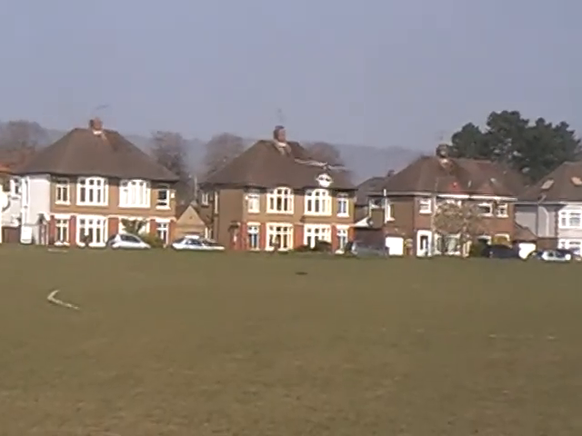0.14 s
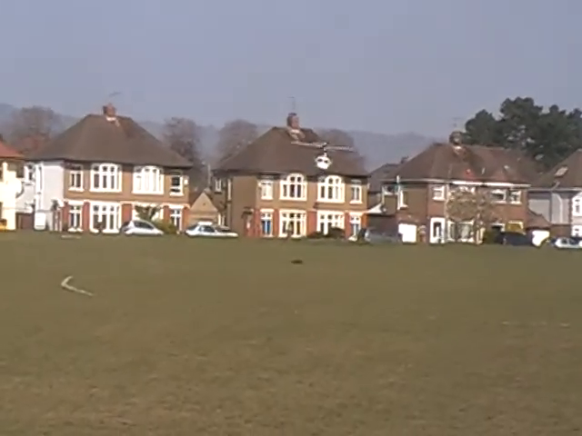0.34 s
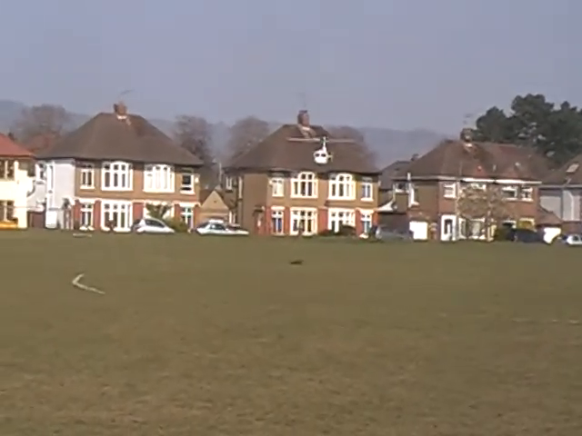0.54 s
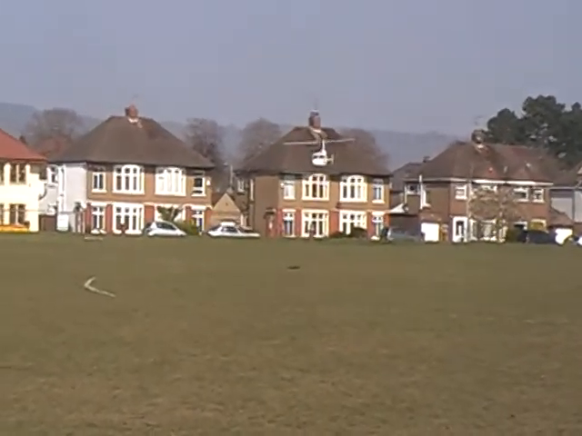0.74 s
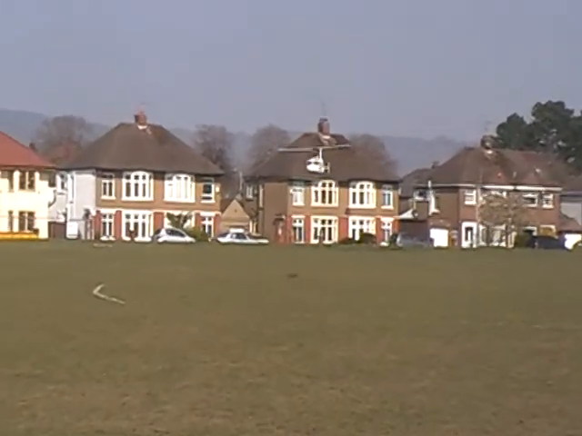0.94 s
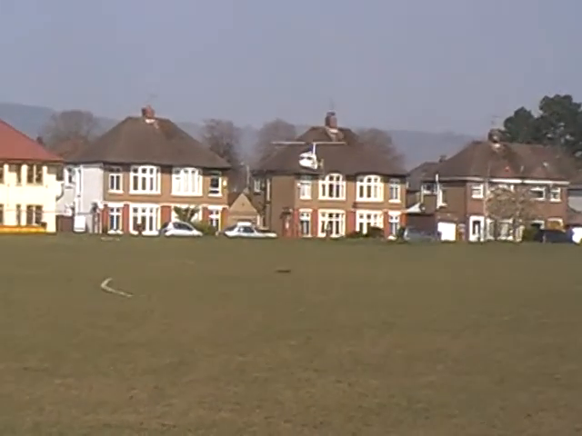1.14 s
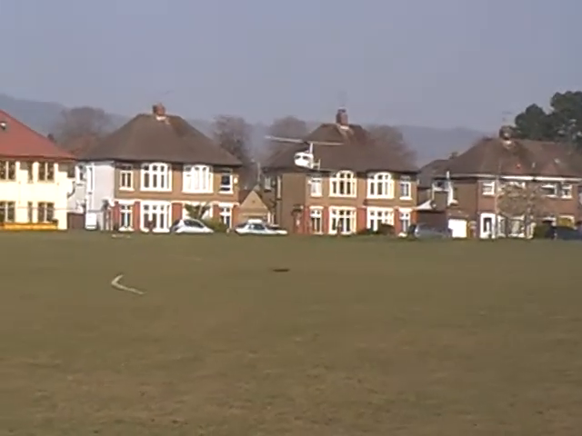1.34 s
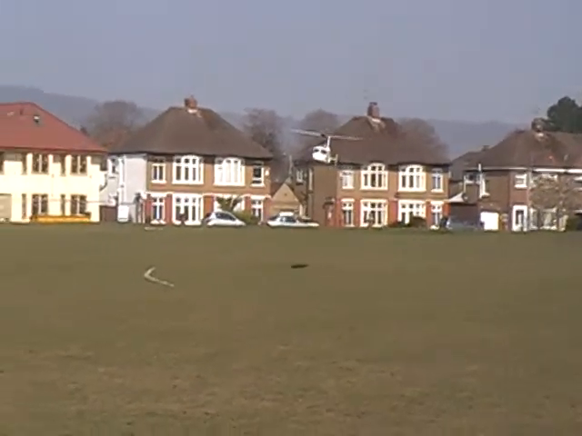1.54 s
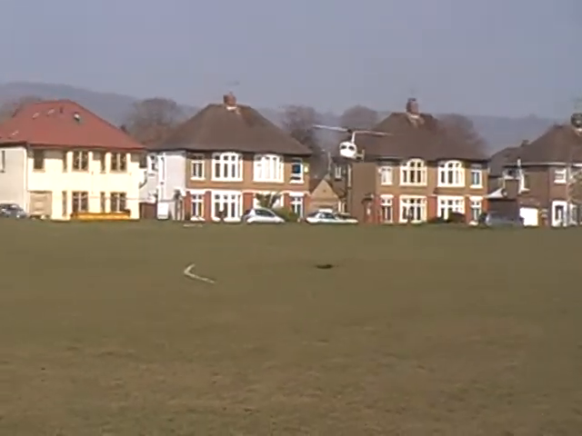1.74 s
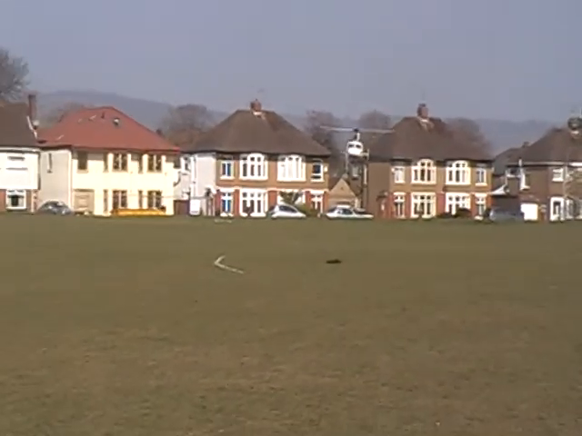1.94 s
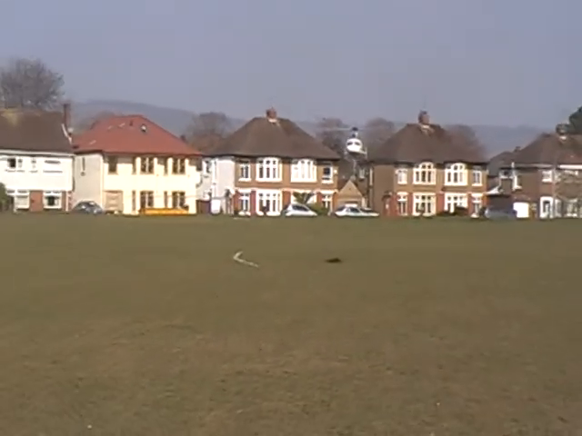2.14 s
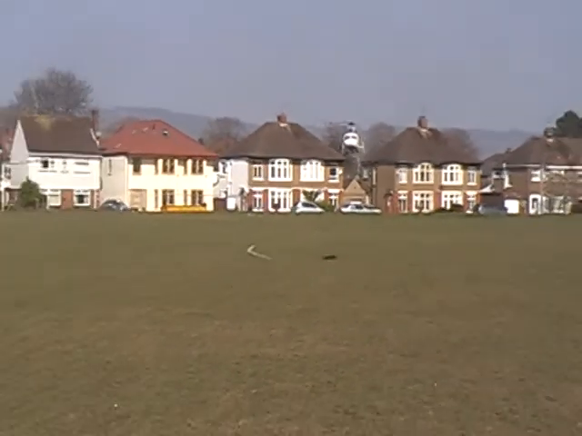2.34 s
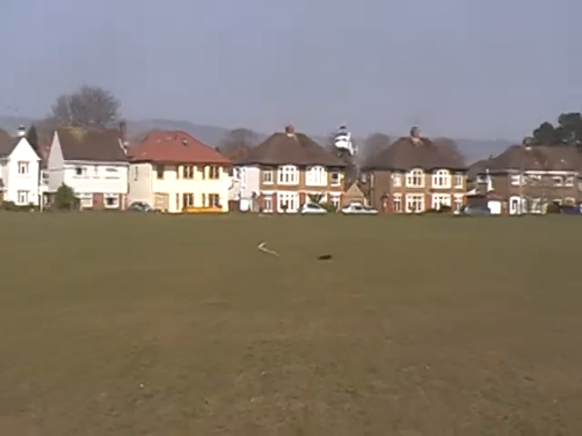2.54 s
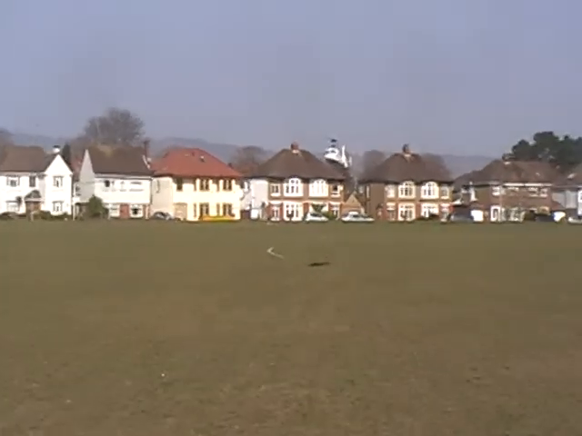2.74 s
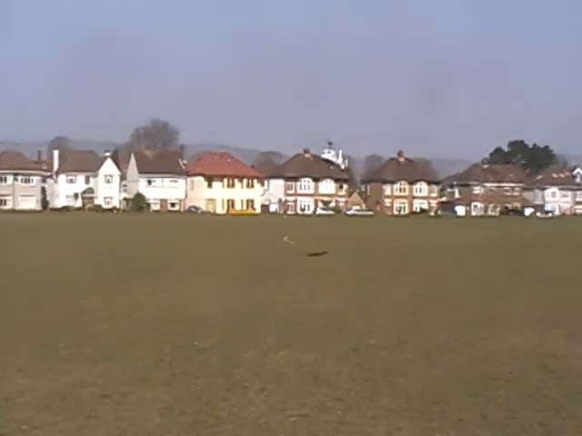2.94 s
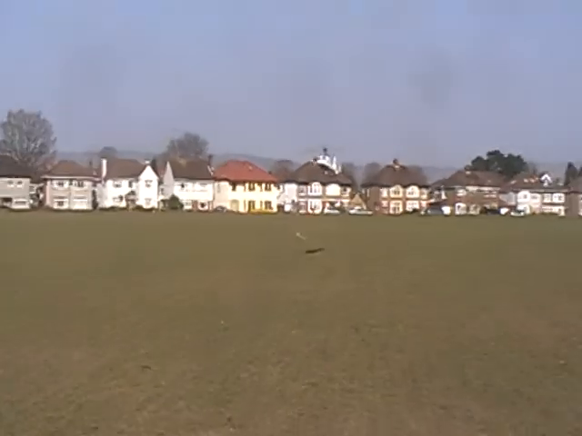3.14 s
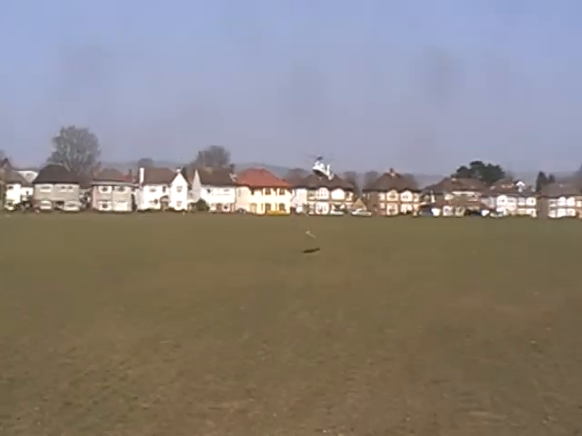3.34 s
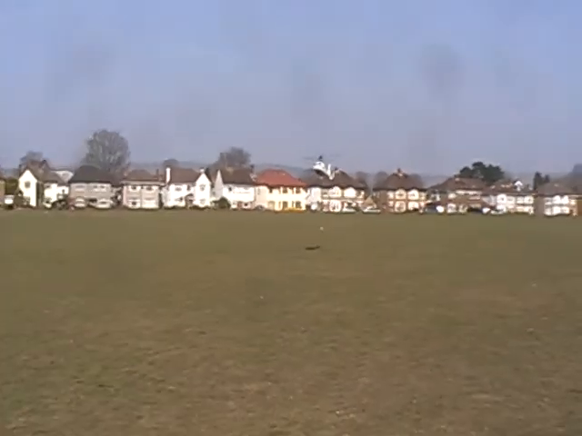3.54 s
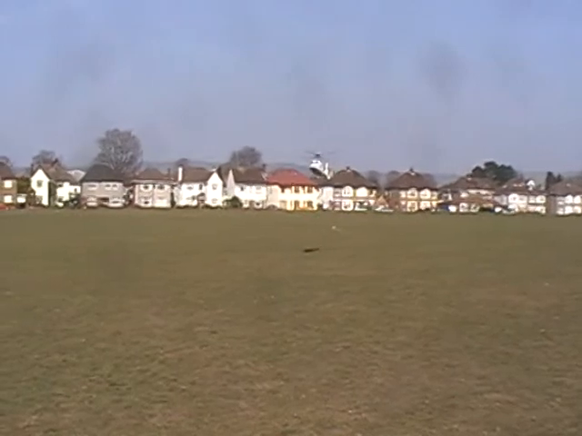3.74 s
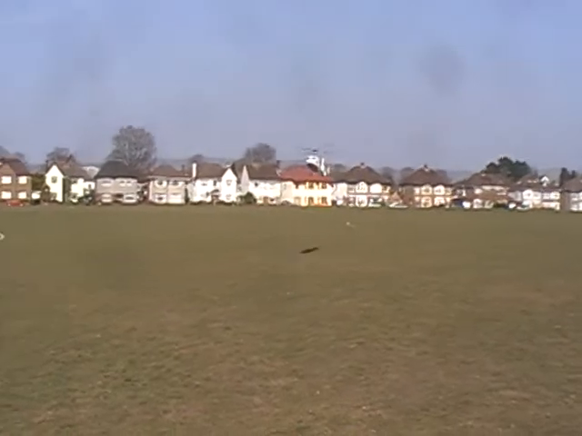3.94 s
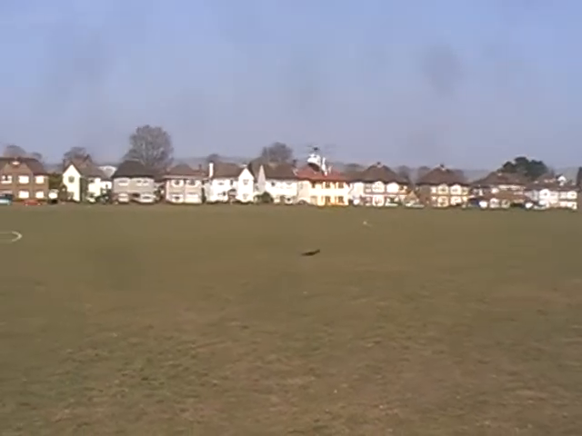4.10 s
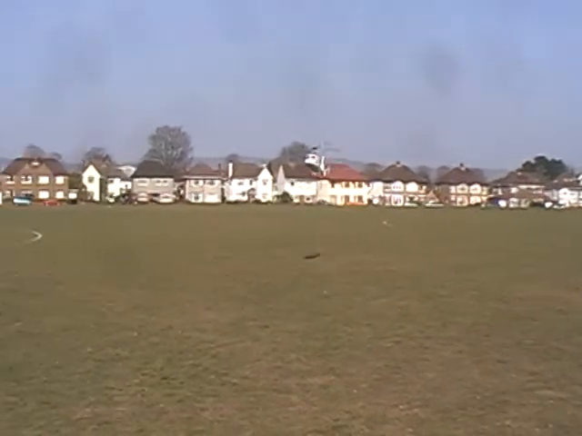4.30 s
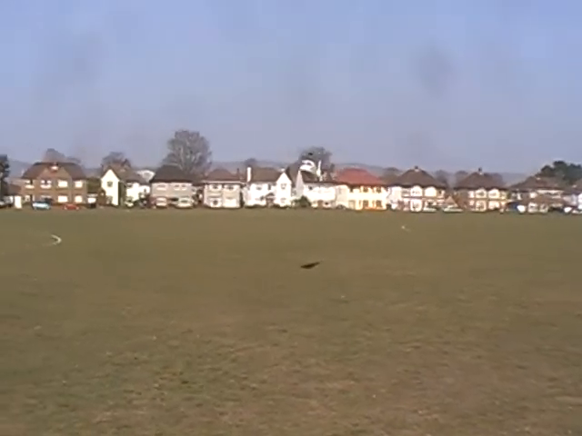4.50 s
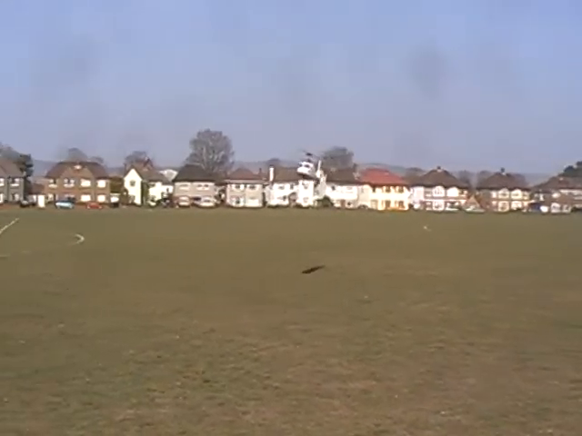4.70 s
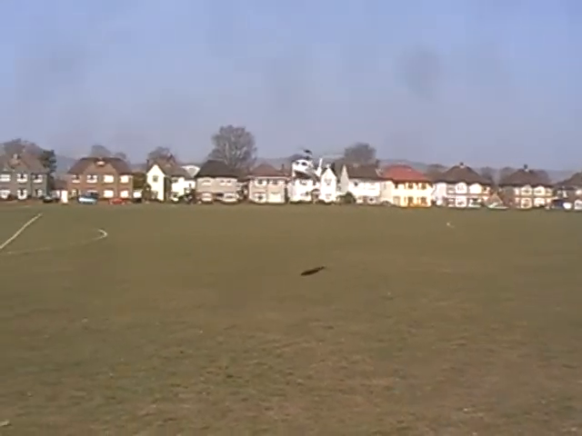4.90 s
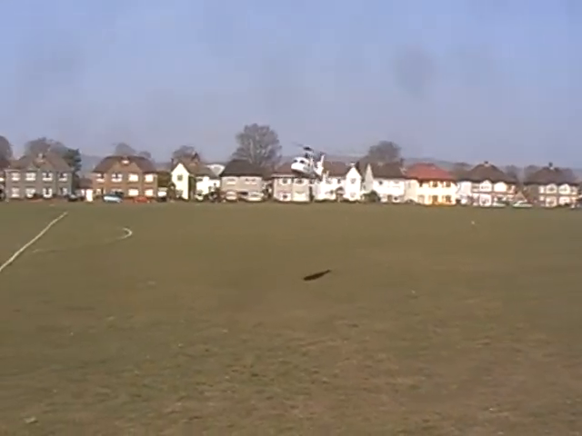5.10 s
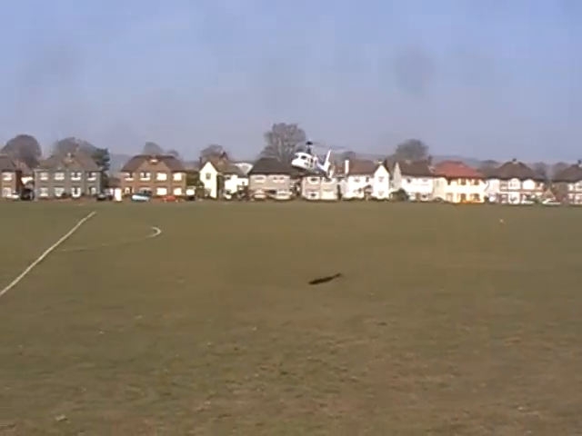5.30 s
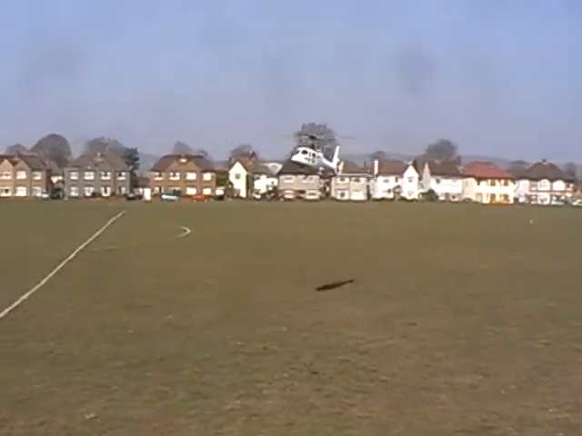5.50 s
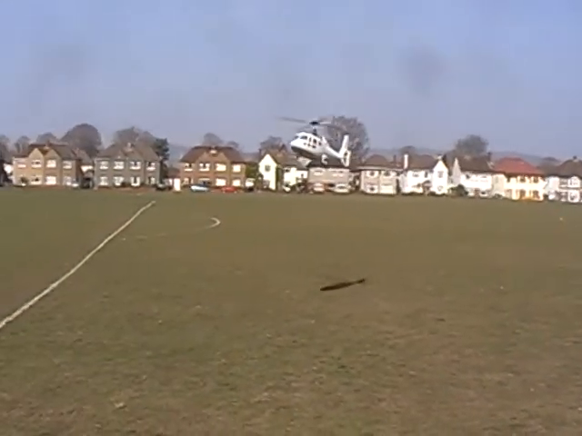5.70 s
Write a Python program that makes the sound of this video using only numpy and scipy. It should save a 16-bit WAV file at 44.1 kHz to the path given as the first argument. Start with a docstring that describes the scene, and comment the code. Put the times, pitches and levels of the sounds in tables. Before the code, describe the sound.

The buzzing two-stroke drone and rushing blades of a model helicopter hover outdoors, sag in pitch, then swell nearer in a light breeze.

```python
"""A buzzing two-stroke drone over rushing blades: a petrol model helicopter, about 20 m off on a playing field.
It hovers nose-on, turns away, then swings back side-on to 6 m from the microphone. The exhaust sings and
hisses, the main gear whines and ticks. The drone also arrives off the grass, so that hollow notches sweep
down the spectrum as it climbs and nears. A light breeze touches the microphone."""
import sys
import numpy as np
from scipy import signal
from scipy.fft import rfft, irfft, next_fast_len
from scipy.io import wavfile
from scipy.ndimage import map_coordinates

SR = 44100
rng = np.random.default_rng(int(sys.argv[2]) if len(sys.argv) > 2 else 0)


def persist_wave(psi):
    """Save psi, clipped to +-1, as 16-bit WAV."""
    counts = np.round(np.clip(psi, -1, 1) * 32767).astype(np.int16)
    wavfile.write(sys.argv[1], SR, np.atleast_2d(counts).T)


N = 254016

# the exhaust tone that the blades chop hardest: firing_multiple, nose_db, tail_db, flank_db
CHOPPED_TONE = [(14, -16.5, -17, -21)]


def crankshaft(slack):
    """Turns of the engine so far; its speed hunts more widely when unloaded."""
    # engine speed at the microphone, sagging through the turn: time_s, firing_hz
    speed = [(0.0, 163.7), (0.67, 163.1), (0.83, 162.3), (2.0, 161.4), (2.49, 159.6), (2.53, 154.8),
             (2.62, 157.6), (2.68, 152.5), (2.76, 156.2), (2.84, 152), (2.9, 154.1), (2.95, 150.6),
             (3.0, 150.8), (3.67, 143.5), (4.15, 145.6), (4.7, 148.5), (5.21, 153), (5.76, 155.7)]
    firing_hz, = curves(speed)
    hunt_hz, swing_hz = 9.6, 0.15 + 0.3 * slack
    hunt = np.sin(2 * np.pi * (hunt_hz * np.arange(N) / SR + 0.23 * wobble(4)))
    return np.cumsum(firing_hz + swing_hz * hunt) / SR


def exhaust(firings, turns, view):
    """The pipe sings harmonics of the firing rate, pulsing slightly with each turn of the rotor."""
    # exhaust tones: firing_multiple, nose_db, tail_db, flank_db
    harmonics = [(1, -16.5, -26.5, -26.5), (2, -19, -10, -18), (3, -22, -22.5, -32), (4, -11, -12, -14),
                 (5, -27, -16, -29), (6, -17, -16.5, -26), (7, -30, -19, -25.5), (8, -25, -22, -23),
                 (9, -19.5, -17, -15.5), (10, -26.5, -15, -25), (11, -22, -12.5, -17),
                 (12, -12.5, -15, -16.5), (13, -27, -17, -18), (15, -28, -16.5, -21), (17, -20, -43, -20),
                 (18, -19, -40, -40), (19, -27, -43, -22), (21, -24, -47, -24), (23, -14.5, -51, -26),
                 (24, -19.5, -40, -22), (25, -51, -30, -22), (26, -30, -31, -41), (33, -13.5, -36, -36),
                 (38, -18, -47, -20), (49, -49, -35, -21)]
    # swells and fades as the pipe swings past the microphone: firing_multiple, time_s, half_s, rise_db
    swings = [(1, 2.4, 0.4, 4), (1, 4.85, .14, 7), (1, 5.28, 0.12, 12), (1, 5.53, .07, -9),
              (2, 2.55, .12, -6), (2, 2.85, .2, 3), (2, 5.76, .15, -7), (4, .55, .25, 3),
              (4, 5.08, 0.27, 6), (6, 0, .3, 5), (6, 4.65, 0.35, 8), (6, 5.2, .2, 9), (6, 5.5, .1, -10),
              (9, 2.4, .4, 3), (9, 5.0, .13, -8), (9, 5.62, .13, 5), (10, 2.15, .2, 4), (10, 5.38, .16, 7),
              (11, 2.9, 0.3, 4.5), (11, 5.3, .25, 5), (12, 2.8, .16, 6), (12, 5.33, .1, -14),
              (12, 5.68, .08, 6), (13, 4.9, .2, 5), (17, .3, 0.3, 8), (23, .68, .14, -12),
              (24, .58, .16, -10), (24, 0, .25, 5), (24, 1.0, .2, 7), (23, 1.1, .2, 6), (25, 5, 0.21, 12),
              (26, 0.5, 0.22, 11), (33, .4, .2, -9), (33, 1, .5, -3), (38, .9, 0.3, 6), (24, 1.6, 0.5, 7),
              (24, 5.17, .12, 7), (23, 1.9, .4, 2)]
    pipe = tones(harmonics, firings, view, flicker_db=1, wander=0.0015, swells=swings)
    return pipe * pulse(turns, depth_db=0.5)


def chopped_exhaust(firings, turns, view):
    """The blades chop one exhaust tone into a deep throb, once a turn."""
    tone = tones(CHOPPED_TONE, firings, view, flicker_db=-2.5, wander=0.0011)
    return tone * pulse(turns, depth_db=8) * pulse(turns / 2, depth_db=0.5)


def exhaust_chirps(firings):
    """The chopped tone breaks through in short chirps during the nose-on hover."""
    # chirps: time_s, half_s, level_db
    chirps = [(0.06, 0.02, -30), (0.573, .02, -29), (0.677, 0.022, -25.5), (0.858, 0.01, -21.5),
              (.907, 0.0077, -24), (1.045, 0.015, -27), (1.14, .014, -33), (1.323, 0.016, -28),
              (1.552, 0.057, -33), (1.68, .018, -32), (1.77, 0.028, -28.5), (1.83, .012, -32),
              (1.88, .012, -31), (2.22, .025, -34)]
    level = bumps([(s, half, amp(db)) for s, half, db in chirps])
    cycles = round(CHOPPED_TONE[0][0]) * firings + 0.08 * wobble(150)
    return level * unit(np.sin(2 * np.pi * cycles))


def exhaust_hiss(firings):
    """Each firing spits a puff of gas, with a buzzing edge."""
    # colour of the escaping gas: frequency_hz, level_db
    colour = [(2500, -10.5), (4450, -7), (5100, 2), (5800, 3.5), (6500, 0), (7500, -7), (9000, -8.5),
              (10500, -17), (13000, -33.5)]
    gas = rng.standard_normal(N) + 0.27 * repeating(firings, size=256)
    puffs = unit(coloured(gas, colour)) * pulse(firings, depth_db=1)
    return over_grass(puffs, bounce=0.081, dull_hz=4860)


def rotor_rush(turns, firings, view):
    """Air rushes off the blades, partly repeating with every turn of the head."""
    # colour of the rush: frequency_hz, level_db
    colour = [(25, -62), (60, -35), (130, -19), (250, -7.5), (400, -8.5), (700, 1.8), (1100, -7.5),
              (1700, -2), (2300, -3), (3200, -7.5), (3800, -8.5), (4400, -14), (6000, -22), (10000, -60)]
    # rush by the side facing the microphone: view, level_db
    beam = [(0, -3), (1, -2.5), (2, -4.5)]
    air = rng.standard_normal(N) + 0.64 * repeating(turns, size=2048)
    rush = unit(coloured(air, colour)) * pulse(firings, depth_db=0.5)
    return amp(np.interp(view, *np.transpose(beam))) * rush


def drive_tones(turns, view):
    """Blades and gears sing at whole multiples of the rotor speed."""
    # blade and gear tones: rotor_multiple, nose_db, tail_db, flank_db
    harmonics = [(4, -41, -39, -30.5), (7, -35, -31, -46), (14, -31, -24.5, -33), (75.4, -31, -23, -17),
                 (79.4, -13.5, -21, -13), (84.5, -35, -14.5, -28), (89.7, -19.5, -21, -7),
                 (104.3, -19, -31, -32), (110.05, -18, -11.5, -19.5), (180, -28, -22.5, -21.5)]
    # swells, heard only where a tone has that rounded multiple: rotor_multiple, time_s, half_s, rise_db
    swings = [(80, 0.17, 0.63, -24), (180, 5, 0.68, 7)]
    return tones(harmonics, turns, view, flicker_db=2.5, wander=0.0004, swells=swings)


def gear_whine(turns):
    """The main gear shrills on high overtones now and then, blurred by its uneven teeth."""
    # shrill spells: time_s, half_s, rotor_multiple, level_db
    spells = [(2.455, 0.083, 262, -34), (3.33, 0.37, 450, -41), (3.785, 0.04, 450, -38),
              (4.003, 0.14, 450, -32.5), (4.35, 0.2, 448, -35), (4.62, 0.21, 444, -40),
              (4.98, 0.17, 450, -46)]
    whine = np.zeros(N)
    for s, half, multiple, db in spells:
        phase = 2 * np.pi * round(multiple) * turns
        blurred = unit((1 + wobble(200)) * np.sin(phase) + wobble(200) * np.cos(phase))
        whine += bumps([(s, half, amp(db))]) * blurred
    return whine * unit(amp(2.6 * wobble(25.03)))


def gear_rasp(turns):
    """Slack teeth tick in a few resonances, scraping at the tight spots and rubbing on between them."""
    # tight spots of the main gear: place_turns, strength
    spots = [(.1, 0.77), (.36, 0.89), (.6, 0.3), (.86, 0.63)]
    # resonances that the teeth tick in: centre_hz, width_hz, level_db
    resonances = [(10300, 1600, 1.5), (12240, 1500, -1), (14400, 3500, -3)]
    # loudness of the rasp: time_s, level_db
    rasp = [(0, -62), (.35, -72), (.72, -56), (1.9, -55), (2.4, -44.5), (2.55, -47), (2.8, -48.5),
            (3.2, -48), (4.1, -45.5), (4.9, -47.5), (5.76, -54)]
    rub, scrape_turns = 0.3, 0.084
    scrapes = sum(strength * np.exp(-(((turns - place + 0.5) % 1 - 0.5) / scrape_turns) ** 2)
                  for place, strength in spots)
    ticks = sum(amp(db + 2.7 * wobble(130)) * band(hz, width) for hz, width, db in resonances)
    rasp_db, = curves(rasp)
    return amp(rasp_db) * unit((rub + scrapes) * ticks)


def airframe_rings(view):
    """The hiss rings hollows of the airframe, which beam to nose, tail or flank."""
    # hollow resonances: centre_hz, width_hz, nose_db, tail_db, flank_db
    hollows = [(3930, 220, -52, -45, -58), (7360, 359, -55, -46, -44), (9160, 530, -50.5, -60, -47),
               (11740, 250, -64, -74, -56)]
    return sum(amp(facing(view, db)) * band(hz, width) for hz, width, *db in hollows)


def blade_swishes(turns):
    """The blades swish in narrow bands, throbbing once a turn."""
    # swishes: time_s, half_s, centre_hz, width_hz, level_db, throb_db
    swishes = [(0, 0.21, 4300, 886, -34.5, -3), (0, 0.1, 6600, 704, -33, -1),
               (0, 0.36, 3600, 247, -33.5, -3), (1.498, 0.33, 5070, 599, -35.5, 0),
               (2.456, .1, 5200, 300, -40, 2), (3.3, 0.31, 5506, 552.2, -36.5, 4),
               (4.1, 0.94, 2163, 260, -38.5, 1), (4.85, .4, 3400, 180, -44, 3)]
    return sum(bumps([(s, half, amp(db))]) * band(hz, width) * pulse(turns, throb_db)
               for s, half, hz, width, db, throb_db in swishes)


def fizz():
    """A fine, even sizzle in the high treble."""
    # colour of the fizz: frequency_hz, level_db
    colour = [(5000, -11), (8000, 10), (10000, -1.5), (11700, -6), (13000, -10), (16000, -9)]
    return noise(colour)


def over_grass(x, bounce, dull_hz):
    """Direct sound plus its late, duller copy off the ground, at about unchanged power."""
    # bounce off the grass: time_s, lowest_notch_hz, strength
    reflection = [(0, 1350, 0.07), (1, 1200, 0.33), (1.5, 1085, 0.44), (2, 984.6, 0.6), (2.6, 783, 0.57),
                  (3.5, 623, 0.73), (4.4, 488.4, 0.45), (5.76, 320.6, 0.24)]
    notch_hz, strength = curves(reflection)
    dulled = filtered(x, lambda hz: 1 / (1 + (hz / dull_hz) ** 2))
    late = map_coordinates(dulled, [np.arange(N) - SR / (2 * notch_hz)], order=3)
    return (x + bounce * strength * late) / np.sqrt(1 + (bounce * strength) ** 2)


def treble_hollow(x, from_hz=15700, to_hz=3400, glide_s=0.19, width_octaves=0.36):
    """A broad phasing dip glides down the treble and fills in."""
    hz, t, spectra = signal.stft(x, SR, nperseg=512)
    centre_hz = to_hz + (from_hz - to_hz) * np.exp(-t / glide_s)
    depth = 0.52 * np.exp(-((t - 0.38) / 0.48) ** 2)  # deepest at 0.38 s
    dip = depth * np.exp(-(np.log2((hz[:, None] + 1) / centre_hz) / width_octaves) ** 2)
    return signal.istft(spectra * (1 - dip), SR, nperseg=512)[1][:N]


def field_scatter(x, view, decay_s=0.023):
    """Faint scatter from field and houses, shifting as the helicopter moves, sets left and right apart."""
    # colour of the left-right difference: frequency_hz, side_db
    colour = [(60, -22), (110, -24), (200, -34), (380, -17), (700, -24), (1290, -17), (2380, -21),
              (4400, -32), (8120, -16), (15000, -6.5)]
    # stereo width by the side facing the microphone: view, change_db
    width = [(0, -2), (1, 2.5), (2, 3)]
    t = np.arange(SR // 8) / SR
    paths = rng.standard_normal((4, len(t))) * amp(-60 * t / decay_s)
    shares = np.array([wobble(2.01) for _ in paths])
    shares /= np.linalg.norm(shares, axis=0)
    scatter = sum(share * signal.fftconvolve(x, path / np.linalg.norm(path))[:N]
                  for share, path in zip(shares, paths))
    side = coloured(scatter, colour) * amp(np.interp(view, *np.transpose(width)))
    return np.array([x + side, x - side]) * amp([[-0.25], [0.25]])


def scuff(time_s, half_s, level_db):
    """A brief dry scrape."""
    # colour of the scrape: frequency_hz, level_db
    colour = [(1500, -22), (3300, -4), (3900, -4), (4450, 0), (5200, -8), (8000, -18), (12000, -38)]
    return bumps([(time_s, half_s, amp(level_db))]) * noise(colour)


def breeze():
    """Wind buffets the microphone, partly different on each side and stronger on the left."""
    # the breeze freshens: time_s, level_db
    wind = [(0, -55.5), (2.7, -50.5), (3.4, -46), (4.1, -41.5), (5.76, -42)]
    # gusts: time_s, half_s, rise_db
    gusts = [(.67, .05, 5), (1.02, 0.11, 4), (4.27, 0.038, 7.5)]
    # colour of the buffeting: frequency_hz, level_db
    rumble = [(20, -28), (40, -35), (65, -1.5), (110, -0.5), (170, 0), (400, -19), (1500, -70)]
    wind_db, = curves(wind)
    pair = noise(rumble) + np.array([noise(rumble), noise(rumble)])
    return amp(wind_db + bumps(gusts)) * unit(pair) * amp([[1.8], [-1.8]])


def tones(table, cycles, view, flicker_db, wander, swells=()):
    """Whole multiples of a shaft's speed; each beams its own way and flickers in the downwash."""
    out = np.zeros(N)
    for multiple, *view_db in table:
        db = facing(view, view_db) + flicker_db * wobble(16)
        db += bumps([bump for k, *bump in swells if round(k) == round(multiple)])
        # churned air shifts short waves by a larger share of their cycle
        phase = round(multiple) * (cycles + wander * wobble(30)) + rng.random()
        out += np.sqrt(2) * amp(db) * np.sin(2 * np.pi * phase)
    return out


def facing(view, levels_db):
    """Level towards the microphone, blended between nose (view 0), tail (1) and flank (2)."""
    return np.interp(view, np.arange(len(levels_db)), levels_db)


def amp(db):
    """Decibels to gain."""
    return 10 ** (np.asarray(db) / 20)


def unit(x):
    """Scaled to rms 1."""
    return x / np.sqrt(np.mean(x ** 2) + 1e-20)


def curves(rows):
    """One value per sample for each column after the time."""
    time_s, *columns = np.transpose(rows)
    return [np.interp(np.arange(N) / SR, time_s, column) for column in columns]


def bumps(rows):
    """Sum of bell-shaped swells (time_s, half_s, height); half_s is the half-length at 1/e."""
    t = np.arange(N) / SR
    return sum(height * np.exp(-((t - s) / half) ** 2) for s, half, height in rows)


def wobble(rate):
    """A smooth random curve, rate knots a second."""
    knots = rng.standard_normal(int(N * rate / SR) + 4)
    coarse = np.arange(0, N, 16)
    return np.interp(np.arange(N), coarse, map_coordinates(knots, [coarse * rate / SR]))


def pulse(cycles, depth_db):
    """A gain of rms 1 that peaks once a cycle."""
    return unit(amp(depth_db * np.cos(2 * np.pi * cycles)))


def filtered(x, response):
    """x times a response of frequency."""
    size = next_fast_len(N + SR // 4)
    return irfft(rfft(x, size) * response(np.fft.rfftfreq(size, 1 / SR)), size)[..., :N]


def coloured(x, spectrum):
    """x through (frequency_hz, level_db) points on a log axis."""
    points_hz, db = np.transpose(spectrum)
    return filtered(x, lambda hz: amp(np.interp(np.log(hz + 1), np.log(points_hz), db)))


def noise(spectrum):
    """Coloured noise of rms 1."""
    return unit(coloured(rng.standard_normal(N), spectrum))


def band(centre_hz, width_hz):
    """Noise of rms 1 in one resonance."""
    white = rng.standard_normal(N)
    return unit(filtered(white, lambda hz: 1 / np.sqrt(1 + ((hz - centre_hz) / width_hz * 2) ** 4)))


def repeating(cycles, size):
    """Noise that comes back the same on every cycle."""
    return unit(np.interp(cycles % 1 * size, np.arange(size), rng.standard_normal(size), period=size))


def scene():
    """One crankshaft times engine, gears and rotor; distance and the side in view set their levels."""
    # play in the drive, greatest while the engine runs unloaded in the turn: time_s, slack (0-1)
    play = [(0, 0.2), (2.1, 0.93), (2.45, 0.6), (3.7, 1), (4.6, 0.15), (5.2, 0.4)]
    # side facing the microphone: time_s, view (0 nose, 1 tail, 2 flank)
    heading = [(0, 0.01), (2.35, 0.1), (2.9, 0.73), (3.9, 0.95), (4.6, 1.03), (5.3, 1.81), (5.76, 2.13)]
    # flight path from the microphone: time_s, distance_m
    flight = [(0, 22.4), (1, 23), (1.5, 19.6), (2.2, 19.7), (2.55, 22.2), (2.85, 20.6), (3.8, 18.3),
              (4.35, 16.7), (4.55, 14), (5.15, 8.93), (5.76, 6.2)]
    # levels by side at hovering distance: view, drone_db, hiss_db, fizz_db
    beam = [(0, -25, -33, -66), (1, -25, -31.5, -40), (2, -26, -32, -40)]
    # brief swells and dips of the treble: time_s, half_s, change_db
    flares = [(.33, 0.23, -1.5), (.8, 0.31, 4.5), (2.15, 0.4, -0.5), (2.56, 0.047, -1), (3.2, 0.088, 1.5)]
    gear_ratio, hover_m = 7.9, 20
    (slack,), (view,), (distance_m,) = curves(play), curves(heading), curves(flight)
    sides, *levels = np.transpose(beam)
    drone_db, hiss_db, fizz_db = (np.interp(view, sides, db) for db in levels)
    shaft = crankshaft(slack)
    firings = shaft + (0.001 + 0.002 * slack) * (wobble(22) + wobble(120))  # less even when slack
    turns = (shaft + 0.0028 * wobble(16)) / gear_ratio
    tonal = exhaust(firings, turns, view) + drive_tones(turns, view)
    tonal += chopped_exhaust(firings, turns, view)
    drone = over_grass(amp(0.88) * tonal + rotor_rush(turns, firings, view), bounce=1, dull_hz=4100)
    body = amp(drone_db) * drone + exhaust_chirps(firings)
    treble = amp(hiss_db) * exhaust_hiss(firings) + amp(fizz_db) * fizz()
    treble += gear_whine(turns) + gear_rasp(turns) + airframe_rings(view) + blade_swishes(turns)
    helicopter = treble_hollow((body + amp(bumps(flares)) * treble) * hover_m / distance_m)
    scrape = scuff(time_s=0.487, half_s=0.009, level_db=-34)
    return field_scatter(helicopter + scrape, view) + breeze()


def record(dry):
    """The microphone thins the deepest bass and keeps nothing above its band limit."""
    low_cut_hz, top_hz = 50, 15800
    return filtered(dry, lambda hz: hz ** 2 / np.hypot(hz ** 2, low_cut_hz ** 2) * (hz < top_hz))


dry = scene()
out = record(dry)
persist_wave(out)
```